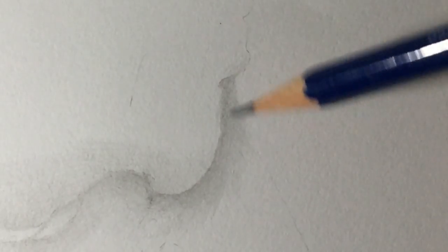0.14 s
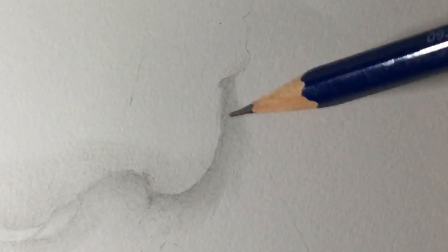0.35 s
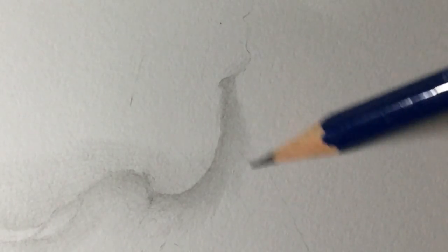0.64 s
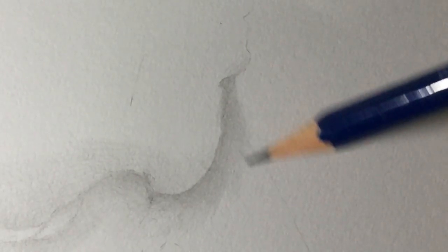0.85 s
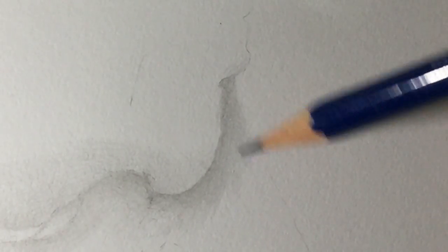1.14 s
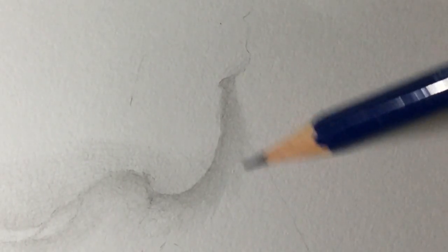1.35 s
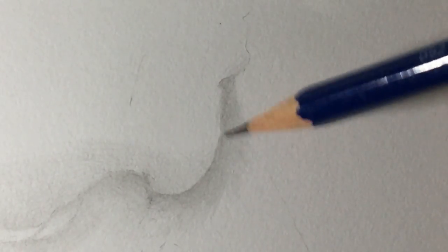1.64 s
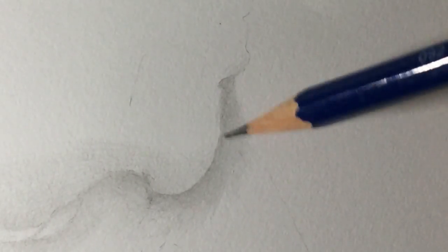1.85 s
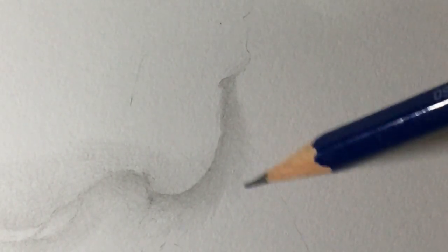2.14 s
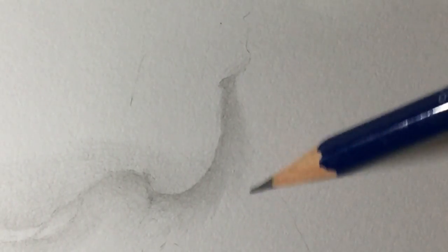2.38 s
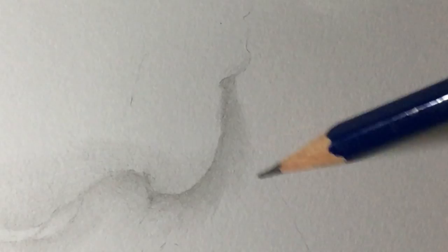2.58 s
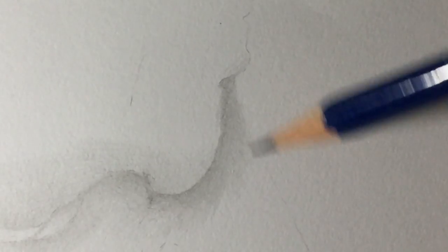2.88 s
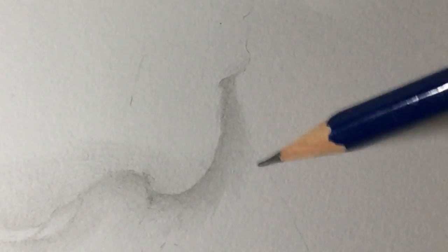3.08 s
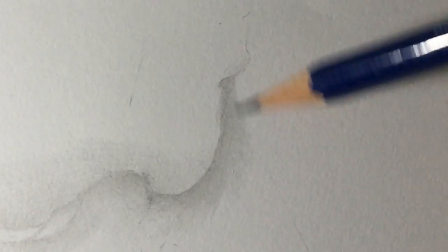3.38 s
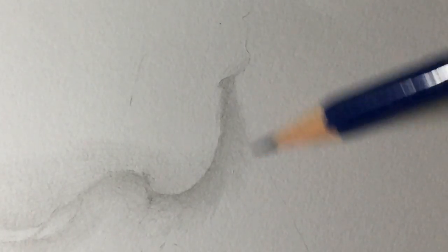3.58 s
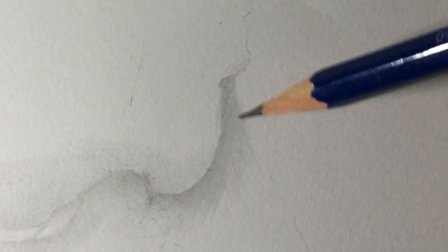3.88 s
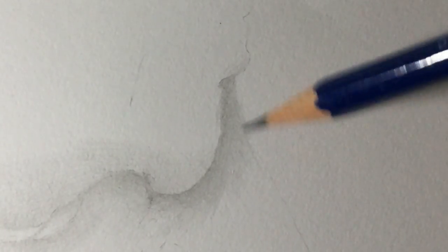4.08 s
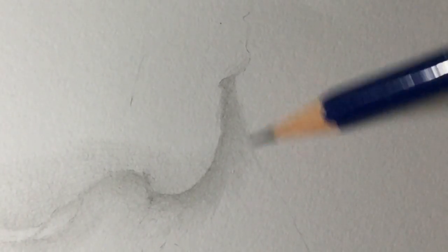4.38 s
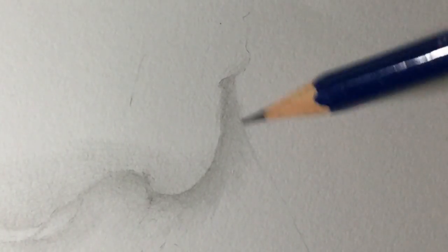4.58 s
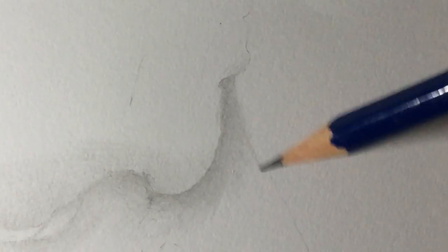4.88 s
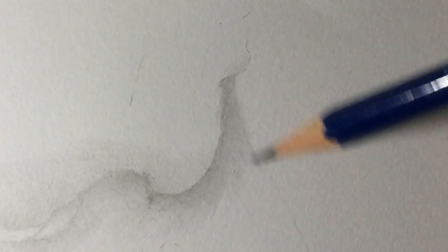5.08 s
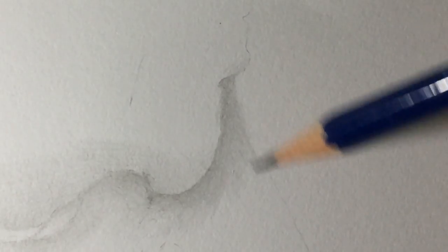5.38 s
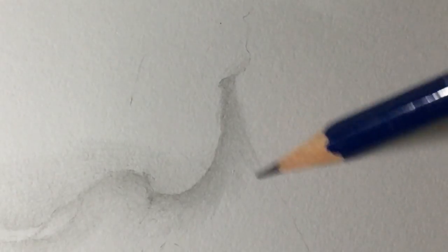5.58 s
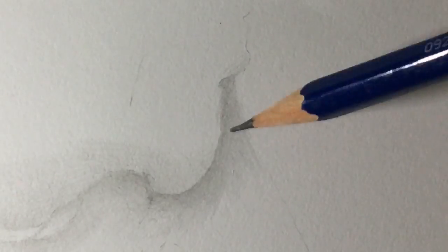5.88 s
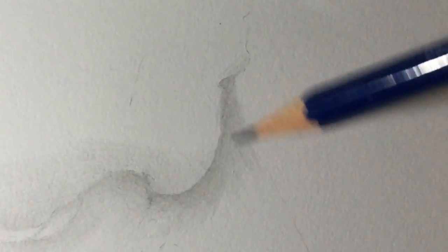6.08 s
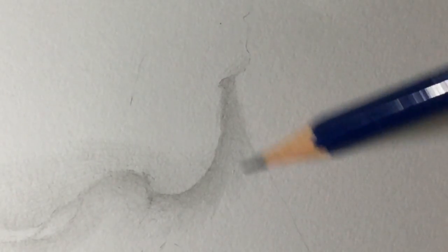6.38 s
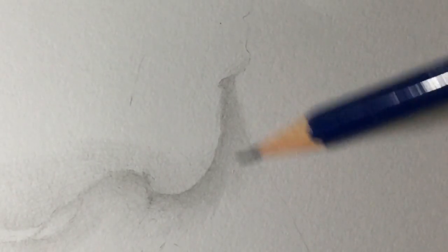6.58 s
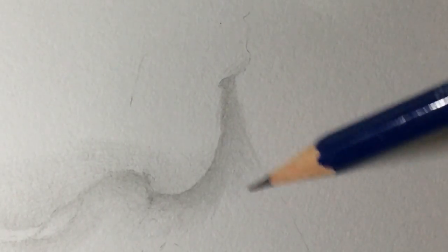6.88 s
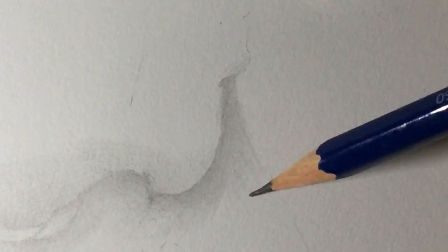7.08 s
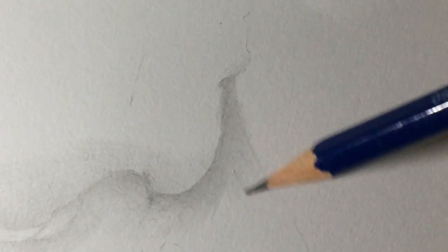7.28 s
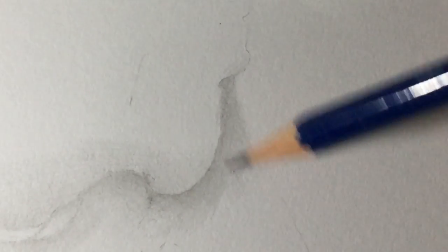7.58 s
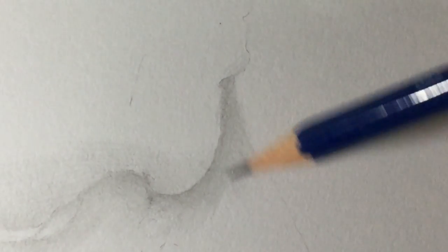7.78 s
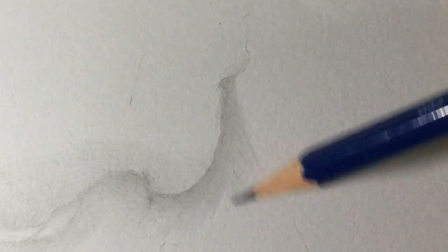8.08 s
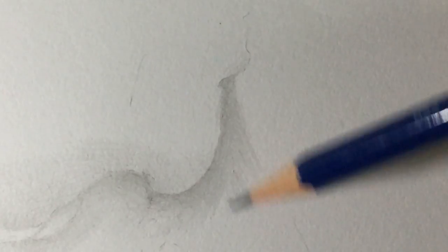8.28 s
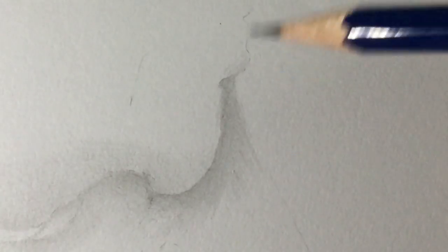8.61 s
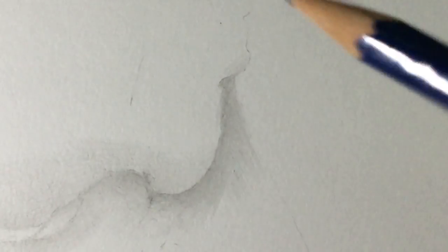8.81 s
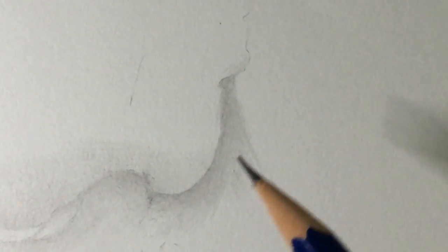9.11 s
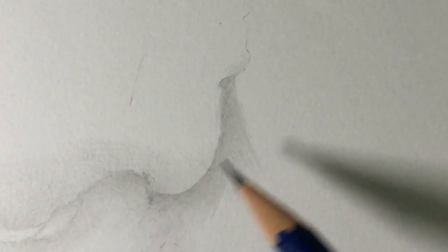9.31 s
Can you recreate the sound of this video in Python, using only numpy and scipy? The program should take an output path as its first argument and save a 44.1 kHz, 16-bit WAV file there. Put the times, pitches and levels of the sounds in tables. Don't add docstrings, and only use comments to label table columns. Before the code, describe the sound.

Close to the microphone, a graphite pencil shades textured paper in short one-way strokes, nearly five per second, bright, dry and scratchy, each swelling and fading quickly, with occasional tiny ticks between. After eight seconds the hand pulls away: a small metal trinket jingles, a sleeve rustles and fingers snap lightly off the sheet. Low ventilation rumble and wavering motor hum continue in the quiet room.

```python
import sys
import numpy as np
from scipy import signal
from scipy.fft import rfft, irfft
from scipy.io import wavfile
from scipy.ndimage import uniform_filter1d

SR = 44100
rng = np.random.default_rng(int(sys.argv[2]) if len(sys.argv) > 2 else 0)


def transcribe(signal):
    frames = np.atleast_2d(signal).T
    limited = np.clip(frames, -1, 1)
    pcm = np.round(limited * 32767).astype(np.int16)
    wavfile.write(sys.argv[1], SR, pcm)


def volts(x):
    e = np.asarray(x, float) / 20
    return 10 ** e


N = 416742

# start in seconds, length in seconds, peak rub in dB, place of
# the peak as a share 0-1, lean to the low modes in dB.
STROKES = [ (-.06, 0.11, -52, .45, 2), (0.162, 0.12, -52.5, .37, 3), (0.385, 0.11, -52.5, 0.3, 1.5),
           (0.597, 0.11, -50.5, .42, 2.5), (0.81, .109, -50.5, 0.4, 3), (1.027, .11, -49.5, 0.38, 2),
           (1.237, 0.1, -48.5, 0.42, 0.5), (1.456, 0.1, -50.5, .35, 1), (1.669, .107, -51.5, 0.31, 2),
           (1.873, .113, -51, 0.37, 0), (2.09, 0.1, -51.5, 0.41, -1), (2.31, .101, -52.5, 0.29, 1),
           (2.559, 0.064, -54.5, 0.25, 1.5), (2.755, 0.12, -51.5, 0.39, 1.5),
           (2.993, 0.11, -49.5, 0.35, 1), (3.223, .11, -50, 0.38, 1), (3.446, 0.13, -50.5, 0.38, 0.5),
           (3.675, 0.12, -51.5, .43, 2), (3.916, 0.12, -52.5, 0.31, 0), (4.151, .104, -51.5, 0.39, 2),
           (4.377, .105, -52, 0.34, 2), (4.612, .09, -53, 0.34, -0.5), (4.826, 0.1, -50, 0.39, -1.5),
               (5.047, .11, -49.5, .42, -0.5), (5.27, 0.11, -49, 0.39, 0), (5.493, 0.11, -51.5, 0.32, 0.5),
               (5.704, .117, -49, 0.34, 0), (5.928, .11, -50, 0.38, 0.5), (6.142, 0.11, -50.5, 0.39, 0),
               (6.356, 0.11, -50, 0.41, 2), (6.575, 0.11, -52, .36, 1), (6.79, 0.11, -53.5, 0.4, 1),
               (7.007, 0.11, -51, 0.39, 0), (7.222, 0.11, -49.5, .48, 1), (7.439, 0.1, -50.5, 0.46, 0.5),
               (7.655, 0.11, -53, 0.33, 2), (7.864, 0.11, -51, 0.42, 0), (8.078, 0.081, -52.5, 0.34, -1.5),
               (8.252, 0.11, -52.5, 0.46, -2.5)]
# time in seconds, peak in dB.
TICKS = [(0.059, -55), (1.1394, -57), (1.5694, -61), (1.7804, -53), (2.204, -60), (2.404, -61),
         (3.3494, -60), (3.5794, -55), (4.0394, -60), (5.1694, -58), (6.472, -58), (6.6882, -52),
         (7.3394, -54), (7.5497, -54)]
# frequency in Hz, width in Hz, level in dB.
PENCIL_MODES = [(2120, 360, -20.5), (3180, 460, -12.5), (4813, 414, -11.5), (5890, 240, -19),
                (6950, 390, -6.5), (7536, 255, -2.5), (8250, 550, -9), (9780, 850, -11), (10416, 443, 0),
                (11800, 480, -10.5), (12500, 330, -8.5), (13400, 350, -9.5), (14150, 220, 0.5),
                (14900, 400, -9.5), (15800, 470, -8)]
# frequency in Hz, level in dB per Hz.
PAPER_SPECTRUM = [(1500, 11), (3000, 2.5), (5400, -11), (9000, -6), (15500, -5)]
# frequency in Hz, width in Hz, rms level in dB.
HAND_SKIM = (13700, 170, -87)
# frequency in Hz, width in Hz, level in dB, link 0-2.
TRINKET_MODES = [(9465, 36, -2, 0), (5500, 180, -10, 1), (10780, 30, 0, 1), (11680, 28, -2, 1),
                 (13200, 40, -2, 2), (11050, 35, -10, 2), (14000, 45, 0, 2)]
# time in seconds, low, middle and high link in dB.
JOLTS = [
    (8.14, -78, -80, -80),
    (8.315, -58, -63, -61),
    (8.448, -75, -80, -79),
    (8.572, -72, -79, -80),
    (8.765, -70, -80, -66),
    (8.876, -83, -80, -85),
]
# frequency in Hz, level in dB per Hz.
SLEEVE_SPECTRUM = [(1760, -40), (3000, -10), (8300, -10), (9280, -6.5), (12200, -11), (13700, -9),
                   (15700, -13)]
# time in seconds, rustle in dB.
RUSTLE = [(8.14, -70), (8.2, -80), (8.26, -69), (8.42, -77), (8.66, -74), (8.772, -66.5), (8.83, -75),
          (8.876, -73), (9.05, -87)]
# time in seconds, peak in dB.
SNAPS = [
    (8.2267, -41),
    (8.5994, -50),
    (8.764, -46),
    (8.8694, -56),
]
# time in seconds, ventilation in dB, extra mid hiss in dB.
VENTILATION = [(0.1, -45.5, -6), (1.21, -45.5, -5), (1.77, -45.5, -7.5), (5.3, -46, -8), (7.78, -44.5, -8),
               (9.35, -45.5, -8)]
# frequency in Hz, level in dB per Hz.
AIR_SPECTRUM = [(16, -51), (28, -8.5), (42, -12.5), (75, -22.5), (150, -21.5), (400, -24.5), (520, -29.5),
                (720, -34.5), (1150, -35.5), (2250, -48.5), (2450, -50.5), (5500, -60.5), (10500, -65.5),
                (12000, -66.5), (16000, -70)]
# frequency in Hz, width in Hz, rms level in dB.
DUCT_MODES = [(44.2, 16, -51), (170.9, 9.2, -57.5), (284.1, 19, -60.5), (363.6, 8.7, -64.5),
              (480.7, 14.7, -61), (556, 24, -69.5), (892, 73, -65), (968, 23, -68), (1105, 68, -66.5),
              (1471, 15, -72.5), (2104, 180, -73.5), (10600, 130, -89)]
# frequency in Hz, wander in Hz, level in dB, motor 0-1.
MOTOR_TONES = [(92.6, 1.37, -3.5, 0), (100.6, 0.27, -6.5, 0), (129.47, 1.575, -1.5, 1), (136.5, 1.6, -8, 1)]
# time in seconds, low motor in dB, high motor in dB.
MOTOR_LOAD = [(.1, -50, -54), (.61, -44.5, -45.5), (1.13, -49.5, -44.5), (1.3, -48.5, -51.5),
              (2.7, -52.5, -47.5), (3.22, -44, -50), (3.58, -49, -44), (3.73, -55, -64), (3.9, -50.5, -47),
              (4.3, -50, -45.5), (5.12, -44.5, -45), (5.36, -55.5, -44.5), (5.85, -44, -47.5),
              (6.3, -51, -47), (7.15, -52.5, -45.5), (7.55, -43, -49.5), (8.0, -49.5, -49.5),
              (9.35, -45.5, -50.5)]
# start in seconds, frequency in Hz, length in seconds, level in dB.
CREAKS = [
    (4.255, 1390, .12, -60),
    (7.46, 900, .18, -59),
    (9.05, 560, .35, -62),
]
# frequency in Hz, width in Hz, level in dB.
AIR_MODES = [(1.51, 4.04, -34.5), (10.74, 10, -34.5), (22.58, 1.68, -35)]
# time in seconds, level in dB.
SWAY_LEVEL = [(.1, -30.5), (.9, -24), (1.28, -32), (1.54, -23.5), (1.8, -28), (3.1, -21), (3.22, -28.5),
              (4.27, -21), (4.5, -30.5), (5.9, -20.5), (7.25, -20.5), (7.62, -25), (8.21, -6.5), (8.5, -16),
              (8.7, -10), (8.91, -22), (9.12, -16), (9.3, -37)]
# time in seconds, half width in seconds, height.
BUMPS = [
    (0, 0.2, 0.073),
    (9.47, 0.078, 0.19),
]


def pencil():
    force, lean_db = strokes()
    force = uniform_filter1d(force, int(.007 * SR))
    keep = np.exp(-1 / (0.088 * SR))
    force += volts(-19) * signal.lfilter([1 - keep], [1, -keep], force)
    touches = volts(-3) * swells(TICKS, decay_s=.005)
    force += uniform_filter1d(touches, int(.006 * SR))

    patches = volts(0.65 * drift(54))
    rub = force * grains(per_s=9000, spread_db=1.5) * patches
    body = 0
    for k, (hz, width_hz, db) in enumerate(PENCIL_MODES):
        tilt = .5 if hz < 9000 else -.5
        lean = volts(uniform_filter1d(lean_db, 500) * tilt)
        ring = resonance(rub * lean, hz, 2.0 * width_hz)
        ring = resonance(ring, hz, 2.0 * width_hz)
        wavering = volts(db + 0.77 * drift(29) + 1.24 * drift(1.6))
        body = body + (-1) ** k * wavering * ring
    sheet = volts(-13.5) * coloured(rub, PAPER_SPECTRUM)

    on_sheet = np.arange(N) < 8.2 * SR
    skim = narrow_noise([HAND_SKIM]) * volts(1.5 * drift(6)) * on_sheet
    return skim + volts(9.0) * body + sheet


def strokes():
    land_s, lift_s = 0.0043, 0.0075
    t, force, lean_db = np.arange(N) / SR, np.full(N, 1e-9), np.zeros(N)
    for s, length_s, db, peak, lean in STROKES:
        first = max(int((s - land_s) * SR), 0)
        on = slice(first, int((s + length_s + lift_s) * SR))
        done = np.clip((t[on] - s + land_s) / (length_s + land_s + lift_s), 0, 1)
        bend = np.log(.5) / np.log(np.clip(peak, .1, .9))
        speed = np.sin(np.pi * done ** bend)
        force[on] += volts(db) * np.abs(speed) ** 1.8
        lean_db[on] = lean
    return force, lean_db


def leaving_hand():
    link_db = jolts()
    jingle = 0
    for hz, width_hz, db, link in TRINKET_MODES:
        shake = np.maximum(volts(link_db[int(link)]) - volts(-98), 0)
        shaken = grains(per_s=800, spread_db=1.5) * shake
        ring = resonance(shaken, hz, width_hz) / np.sqrt(np.pi * abs(width_hz) / SR)
        jingle = jingle + volts(db) * ring

    rustle_db, = in_time(RUSTLE, outside=-200)
    cloth = rms_one(coloured(grains(per_s=9800, spread_db=2.5), SLEEVE_SPECTRUM))
    snaps = uniform_filter1d(volts(-11) * swells(SNAPS, decay_s=.004), 90)
    return volts(4.5) * jingle + (volts(rustle_db + 5.5) + snaps) * cloth


def jolts():
    rise_db_per_s, fall_db_per_s = 600, 170
    t, level_db = np.arange(N) / SR, np.full((3, N), -200.)
    for s, *link_db in JOLTS:
        slope_db = np.where(t < s, rise_db_per_s * (t - s), fall_db_per_s * (s - t))
        level_db = np.maximum(level_db, np.array(link_db)[:, None] + slope_db)
    return level_db


def ventilation():
    vent_db, mid_db = in_time(VENTILATION)
    hiss = rms_one(coloured(rng.standard_normal(N), AIR_SPECTRUM))
    air = volts(-41.5) * hiss + narrow_noise(DUCT_MODES)
    mid = signal.sosfilt(signal.butter(1, [700, 2800], "band", fs=SR, output="sos"), air)
    extra_mid = (volts(mid_db - mid_db.mean()) - 1) * mid
    swell = volts(vent_db - vent_db.mean()) * (air + extra_mid)
    steady = signal.sosfilt(signal.butter(2, 4000, "high", fs=SR, output="sos"), air - swell)
    return swell + steady


def motors():
    load_db, out = in_time(MOTOR_LOAD), 0
    for hz, wander_hz, db, motor in MOTOR_TONES:
        phase = 2 * np.pi * np.cumsum(hz + wander_hz * drift(2.445)) / SR
        level = volts(db + load_db[int(motor > .5)] + 2.8 * drift(4.0))
        out = out + level * np.sqrt(2) * np.sin(phase)
    return out


def creaks():
    out = np.zeros(N)
    for s, hz, length_s, db in CREAKS:
        t = np.arange(int(length_s * SR)) / SR
        unsteady = np.cumsum(rng.normal(0, .018, len(t)))
        creak = np.sin(2 * np.pi * hz * t * (1 - .08 * t) + unsteady)
        out[int(s * SR):][:len(t)] += volts(db + 6) * np.sin(np.pi * t / length_s) * creak
    return out


def sway():
    t = np.arange(N) / SR
    mode = np.sqrt(2) * np.sin(2 * np.pi * np.cumsum(8.7 + 0.896 * drift(0.773)) / SR)
    loose = rms_one(narrow_noise(AIR_MODES[:2]))
    moving = volts(in_time(SWAY_LEVEL)[0]) * (volts(-2.0) * mode + volts(-6.5) * loose)
    moving = .5 * np.tanh(moving / .5)
    low = signal.sosfiltfilt(signal.butter(4, 17, fs=SR, output="sos"), moving)
    out = low + narrow_noise(AIR_MODES[2:])
    for s, half_s, height in BUMPS:
        out += height * np.exp(-((t - s) / half_s) ** 2)
    return out


def grains(per_s, spread_db):
    sizes = volts(spread_db * np.minimum(rng.exponential(1, N), 5)) * rng.choice([-1, 1], N)
    return rms_one(sizes * (rng.random(N) < per_s / SR))


def swells(events, decay_s):
    starts = np.full(N, 1e-18)
    starts[[round(s * SR) for s, db in events]] = volts(np.array(events)[:, 1])
    return signal.lfilter([1], [1, -np.exp(-1 / (decay_s * SR))], starts)


def resonance(x, hz, width_hz):
    r = np.exp(-np.pi * abs(width_hz) / SR)
    poles = [1, -2 * r * np.cos(2 * np.pi * hz / SR), r * r]
    return signal.lfilter([(1 - r * r) / 2, 0, (r * r - 1) / 2], poles, x)


def narrow_noise(modes):
    out = 0
    for hz, width_hz, db in modes:
        white = rng.standard_normal(N + SR)
        band = resonance(resonance(white, hz, width_hz), hz, width_hz)
        out = out + volts(db) * rms_one(band[SR:])
    return out


def coloured(x, spectrum):
    hz = np.maximum(np.fft.rfftfreq(len(x), 1 / SR), 1)
    points = np.array(spectrum)
    gain_db = np.interp(np.log(hz), np.log(points[:, 0]), points[:, 1])
    return irfft(rfft(x) * volts(gain_db), len(x))


def drift(rate):
    r = np.exp(-80 * np.pi * rate / SR)
    slow = signal.lfilter([1], [1, -2 * r, r * r], rng.standard_normal(N // 40 + 2002))[2000:]
    return np.interp(np.arange(N) / 40, np.arange(len(slow)), rms_one(slow))


def in_time(rows, outside=None):
    s, *columns = np.transpose(rows)
    return [np.interp(np.arange(N) / SR, s, c, outside, outside) for c in columns]


def rms_one(x):
    return x / np.sqrt(np.mean(x ** 2) + 1e-20)


def scene():
    room = ventilation() + motors() + creaks()
    return (pencil() + leaving_hand() + room + sway())[None]


def top_cut(x):
    return signal.sosfilt(signal.butter(12, 15980, fs=SR, output="sos"), x)


def record(dry):
    steep = signal.ellip(12, .5, 70, 15760, fs=SR, output="sos")
    mix = signal.sosfilt(steep, dry)
    return top_cut(mix)


dry = scene()
out = record(dry)
transcribe(out)
```